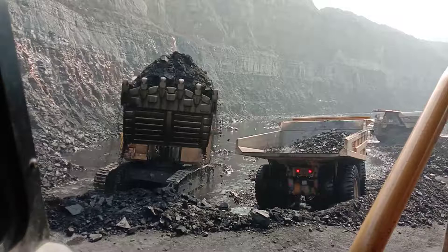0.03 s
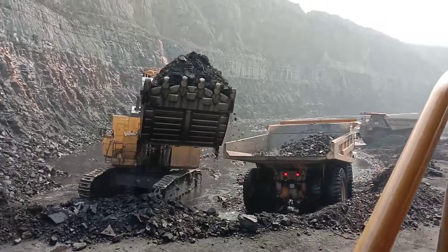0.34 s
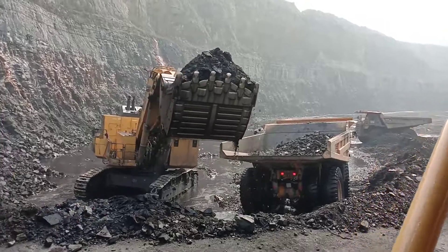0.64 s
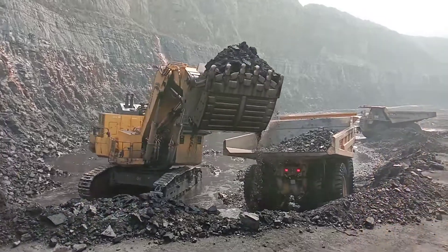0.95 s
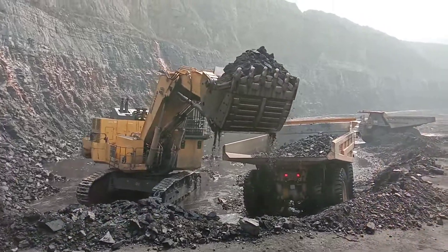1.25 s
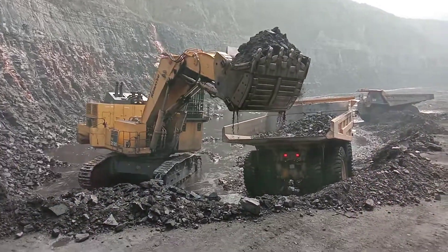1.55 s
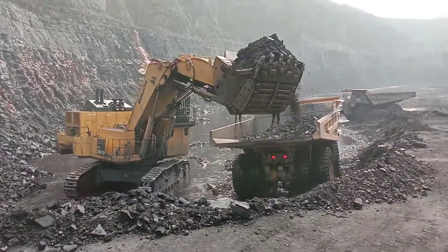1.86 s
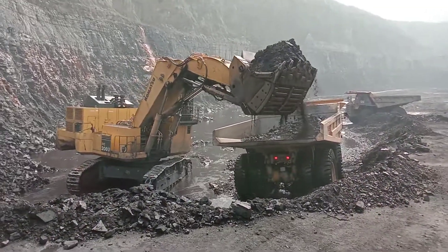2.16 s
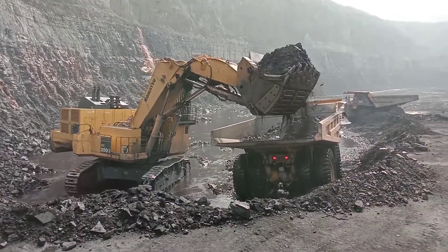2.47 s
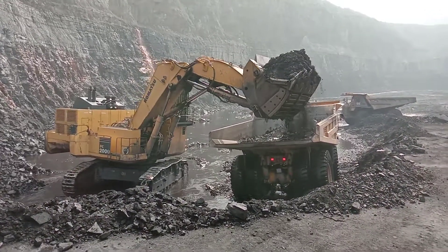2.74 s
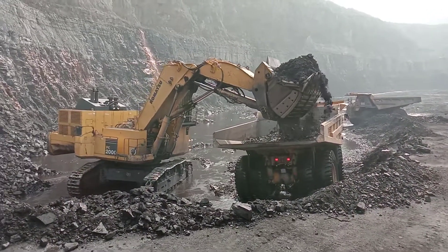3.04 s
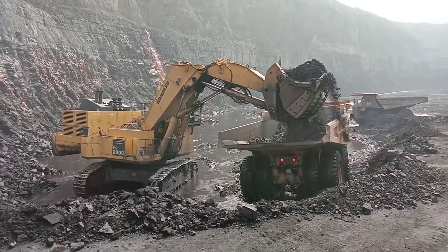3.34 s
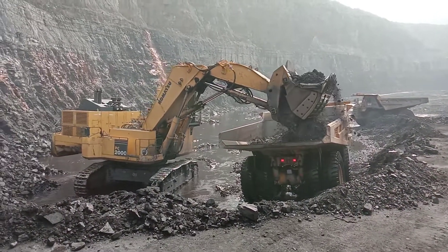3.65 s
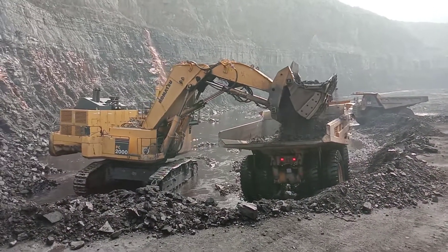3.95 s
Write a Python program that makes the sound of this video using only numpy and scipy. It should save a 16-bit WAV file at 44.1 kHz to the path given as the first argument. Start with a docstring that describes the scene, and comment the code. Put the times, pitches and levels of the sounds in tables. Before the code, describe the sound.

A big diesel engine idles close by in an open-pit mine, droning deeply and knocking. Farther off, an excavator squeaks and hums as it swings, then coal hisses into a truck with a few cracking lumps.

```python
"""A big diesel idles close by in an open-pit mine: a deep drone, knocks that repeat each engine cycle,
and a ringing cover. Farther off an excavator swings its bucket over a truck, its joints squeaking and
its hum rising under load. It tips out coal: fines hiss over the steel, small pieces rattle,
and a few heavier lumps crack down into the truck body."""
import sys
import numpy as np
from scipy import signal
from scipy.fft import rfft, irfft
from scipy.io import wavfile
from scipy.ndimage import uniform_filter1d

SR = 44100
rng = np.random.default_rng(int(sys.argv[2]) if len(sys.argv) > 2 else 0)


def digitize_waveform(pressure):
    """Quantize a signal to 16-bit integers and store it at the path in sys.argv[1].

    Rows of a 2-D input are taken as channels; values are limited to [-1, 1].
    """
    field = np.atleast_2d(pressure).T
    bounded = np.clip(field, -1, 1)
    quanta = np.round(bounded * 32767).astype(np.int16)
    wavfile.write(sys.argv[1], SR, quanta)


N = 176400
CYCLE_HZ = 5.8315  # four-stroke cycles per second


def undb(db):
    return 10 ** (np.asarray(db) / 20)


def unit_rms(x):
    return x / np.sqrt(np.mean(x ** 2))


def clock():
    return np.arange(N) / SR


def noise():
    return rng.standard_normal(N)


def curve(points):
    """Straight lines through (time_s, value) points."""
    return np.interp(clock(), *np.array(points).T)


def colour(x, points):
    """Filter by (freq_hz, gain_db) points."""
    hz, db = np.array(points, float).T
    bins_hz = np.maximum(np.arange(N + 1) * SR / (2 * N), 1)
    gain = undb(np.interp(np.log(bins_hz), np.log(hz), db))
    return irfft(rfft(x, 2 * N) * gain)[:N]


def ring(x, hz, width_hz):
    """One resonance."""
    return signal.lfilter(*signal.iirpeak(hz, hz / width_hz, fs=SR), x)


def wander(rate_hz):
    """Smooth random drift, rms 1."""
    hold = int(SR / rate_hz)
    steps = np.repeat(rng.standard_normal(N // hold + 1), hold)
    return unit_rms(uniform_filter1d(uniform_filter1d(steps, hold), hold)[:N])


def tone(hz):
    """Sine of rms 1 on a fixed or moving pitch."""
    turns = np.cumsum(hz * np.ones(N)) / SR + rng.random()
    return np.sqrt(2) * np.sin(2 * np.pi * turns)


def impact_power(starts_s, sizes, decay_s):
    """Power envelope of decaying blows."""
    hits = np.bincount((starts_s * SR).astype(int), sizes ** 2, N)[:N]
    return signal.lfilter([1], [1, -np.exp(-2 / (decay_s * SR))], hits)


def treble_flicker(x, depth_db=1.1):
    """Each treble band wavers in level on its own."""
    bins_hz = np.arange(N // 2 + 1) * SR / N
    edges_hz = np.geomspace(2000, 16000, 19)
    spectrum = rfft(x)
    out = irfft(spectrum * (bins_hz < edges_hz[0]), N)
    for low, high in zip(edges_hz, edges_hz[1:]):
        band = irfft(spectrum * ((bins_hz >= low) & (bins_hz < high)), N)
        out += band * undb(depth_db * wander(30.04))
    return out


# Diesel cover whine: time_s, level_db
GEAR_LEVELS = [(.3, -40), (1.7, -36.5), (2.22, -29), (2.55, -33), (4, -33)]

def diesel_cover_whine(pitch_hz=1273, drift=0.01207, waver_db=1.5):
    """A warbling whine from the diesel's ringing cover, loudest from about 2.2 s."""
    whine = tone(pitch_hz * (1 + drift * wander(40)))
    return whine * undb(curve(GEAR_LEVELS) + waver_db * wander(25.05))


# Excavator hum: time_s, pitch_hz, level_db
LOAD_HUM = [(.4, 158.4, -37), (1.2, 160.4, -33.5), (1.55, 172, -27), (1.85, 176.2, -33.5),
            (3.0, 178.8, -41), (3.22, 171.3, -29), (3.43, 172.5, -26), (3.75, 172, -30), (4, 172.6, -49)]

def excavator_hum(drift=0.0068, waver_db=1.1):
    """The hum rises and swells under load."""
    time_s, pitch_hz, level_db = np.array(LOAD_HUM).T
    hum = tone(np.interp(clock(), time_s, pitch_hz) * (1 + drift * wander(15)))
    return hum * undb(np.interp(clock(), time_s, level_db) + waver_db * wander(12))


# Boom and bucket squeaks: centre_s, half_length_s, pitch_hz, level_db
JOINT_SQUEAKS = [(0.457, 0.0095, 10100, -49), (.60, .02, 2740, -37), (.84, .035, 2620, -35),
                 (0.94, 0.023, 2780, -33), (1.04, 0.027, 2770, -35), (1.113, 0.023, 2800, -29.5),
                 (1.34, 0.02, 2630, -38), (1.378, 0.021, 2540, -33), (1.535, .035, 2580, -34),
                 (1.682, .02, 2620, -30), (1.725, .02, 2480, -36), (2.65, 0.057, 7380, -35.5),
                 (2.728, 0.014, 6980, -34), (3.095, .035, 2590, -29)]

def joint_squeaks(width_hz=84):
    """Joints give short rough squeaks as the boom swings and the bucket tips."""
    out = np.zeros(N)
    for centre_s, half_length_s, pitch_hz, level_db in JOINT_SQUEAKS:
        squeak = ring(ring(noise(), pitch_hz, width_hz), pitch_hz, 2 * width_hz)
        envelope = np.exp(-((clock() - centre_s) / half_length_s) ** 2)
        out += undb(level_db) * unit_rms(squeak) * envelope
    return out


# Coal flow off the bucket: time_s, level_db
COAL_FLOW = [(.5, -42.5), (1.22, -34.5), (1.35, -34), (1.93, -32), (2.05, -27), (2.2, -25), (2.48, -27.5),
             (2.72, -27.5), (3.05, -28.5), (3.5, -29.5), (4, -28)]
# Sliding coal spectrum: freq_hz, density_db
COAL_SPECTRUM = [(300, -36), (1000, -1), (2000, 5), (3800, 2), (5500, -1.5), (7000, -5), (10000, -10.5),
                 (13000, -20), (15500, -24)]
# Resonances of the steel under the coal: freq_hz, width_hz, gain_db
STEEL_MODES = [(1545, 17, -2), (2135, 14, -3), (3660, 14, -5), (6000, 13, -17), (6475, 45, 1),
               (6900, 470, -6), (7350, 180, -9.5)]

def sliding_coal(grains_per_s=320, grain_share=0.23, spread_db=0.5, flicker_db=3):
    """Fines hiss and small pieces tick as the load slides out, making the steel sing."""
    hiss = noise()
    when, chance = rng.random((int(grains_per_s * N / SR), 2)).T
    sizes = undb(-spread_db * np.log(chance))
    power = impact_power(when * N / SR, sizes, decay_s=0.0041)
    envelope = np.sqrt(1 - grain_share + grain_share * power / power.mean())
    stream = colour(hiss * envelope, COAL_SPECTRUM)
    steel = sum(undb(gain_db + flicker_db * wander(9.15)) * ring(stream, freq_hz, width_hz)
                for freq_hz, width_hz, gain_db in STEEL_MODES)
    return unit_rms(stream + steel) * undb(curve(COAL_FLOW))


# Lumps landing in the truck: start_s, gain_db, centre_hz
LUMP_HITS = [(1.881, -20, 980), (2.026, -25, 3200), (2.237, -25.5, 3070), (2.724, -27, 2800),
             (2.748, -22, 2170), (2.824, -24, 4000), (2.902, -31, 6460), (3.022, -38, 3130),
             (3.342, -24, 3280), (3.58, -24, 900), (3.80, -26, 795)]

def coal_lumps(rise_s=0.0021, decay_s=0.019):
    """Lumps crack on the heap, some dull and some bright."""
    out = np.zeros(N)
    for start_s, gain_db, centre_hz in LUMP_HITS:
        age_s = np.maximum(clock() - start_s, 0)
        band = ring(noise(), centre_hz, width_hz=centre_hz)
        crack = unit_rms(ring(band, centre_hz, width_hz=centre_hz))
        envelope = 1.17 * (1 - np.exp(-age_s / rise_s)) * np.exp(-age_s / decay_s)
        out += undb(gain_db) * crack * envelope
    return out


# Engine cycle harmonics: order, level_db
ENGINE_ORDERS = [(8, -58), (12, -37.5), (14, -41), (16, -46), (17, -39), (18, -38), (19, -35.5),
                 (21, -23.5), (22, -38.5), (25, -35.5), (30, -68), (32, -36), (38, -42.5), (42, -50)]
# Gear and pump whines: pitch_hz, level_db
ENGINE_WHINES = [(248.5, -40.5), (309.5, -41), (394, -38), (541.7, -42), (893.6, -41.5), (1073, -40)]
# Exhaust rumble spectrum: freq_hz, density_db
EXHAUST_SPECTRUM = [(20, -12), (35, -25), (55, -6.5), (75, -16.5), (95, 9), (130, -5.5), (180, -2),
                    (260, -13.5), (500, -14), (1500, -50)]

def diesel_drone(order_waver_db=0.8, whine_waver_db=1, whine_drift=0.00087, rumble_db=-28.5):
    """Low orders of the engine cycle over exhaust rumble, with thin gear and pump whines."""
    orders = sum(undb(level_db + order_waver_db * wander(14)) * tone(order * CYCLE_HZ)
                 for order, level_db in ENGINE_ORDERS)
    whines = np.zeros(N)
    for pitch_hz, level_db in ENGINE_WHINES:
        gain = undb(level_db + whine_waver_db * wander(10))
        whines += gain * tone(pitch_hz * (1 + whine_drift * wander(12)))
    rumble = undb(rumble_db) * unit_rms(colour(noise(), EXHAUST_SPECTRUM))
    return orders + whines + rumble


# Knocks in one engine cycle: cycle_fraction, strength_db
CYCLE_KNOCKS = [(0.051, 0.5), (.115, -1), (0.182, -4), (0.408, -4), (0.489, -1.5), (.565, -8.5), (0.632, 1),
                (0.769, -10.5), (0.828, -3.5), (.905, 3)]
# Block and valve clatter spectrum: freq_hz, density_db
BLOCK_SPECTRUM = [(120, -34), (200, 5.5), (300, 0.5), (500, -2), (720, 1), (900, -2.5), (1500, 0),
                  (2000, -5.5), (2700, -6.5), (3100, -12.5), (4000, -12), (6500, -22), (10000, -29),
                  (15500, -51)]

def diesel_clatter(block_db=-24, cover_db=-36, cover_hz=1262, scatter_db=0.8, waver_db=0.6):
    """The same uneven knocks come round each cycle, shake the block and ring a cover."""
    cycle_fraction, strength_db = np.array(CYCLE_KNOCKS).T
    cycles = np.arange(int(N / SR * CYCLE_HZ) + 1)[:, None]
    starts_s = (cycles + cycle_fraction) / CYCLE_HZ
    sizes = undb(strength_db + scatter_db * rng.standard_normal(starts_s.shape))
    power = impact_power(starts_s.ravel(), sizes.ravel(), decay_s=0.015)
    repeat_share, rattle_floor = 0.33, 0.9
    repeating = np.resize(noise()[:int(SR / CYCLE_HZ)], N)
    rattle = np.sqrt(repeat_share) * repeating + np.sqrt(1 - repeat_share) * noise()
    knocking = rattle * np.sqrt(power + rattle_floor ** 2)
    block = colour(knocking * undb(waver_db * wander(22.2)), BLOCK_SPECTRUM)
    cover = ring(ring(knocking, cover_hz, width_hz=95), cover_hz, width_hz=560)
    return undb(block_db) * unit_rms(block) + undb(cover_db) * unit_rms(cover)


def scene():
    """Diesel, excavator and coal, alike in both channels."""
    machines = diesel_drone() + diesel_cover_whine() + excavator_hum() + joint_squeaks()
    lumps = coal_lumps()
    swell = undb(curve([(0.15, -3.5), (0.65, 0)]))  # clatter comes up just after the drone
    clatter_and_coal = treble_flicker(swell * diesel_clatter() + sliding_coal())
    return np.tile(machines + lumps + clatter_and_coal, (2, 1))


# Microphone response: freq_hz, gain_db
MIC_RESPONSE = [(3500, 0.5), (4150, -1), (4400, -4), (6200, -1), (6600, 0), (7350, 0.5), (8000, -5.5),
                (8800, 0), (10500, 3.5), (12000, 1), (13900, 1.5), (14900, 8)]

def record(dry):
    """Microphone colour, a quick fade up from near silence, and a steep low-pass."""
    start_s, fade_s, floor_db, cutoff_hz = 0.15, 0.27, -72, 15450
    fade = np.clip((clock() - start_s) / fade_s, 0, 1) ** 0.85 + undb(floor_db)
    coloured = np.array([colour(channel, MIC_RESPONSE) for channel in dry])
    lowpass = signal.ellip(10, 0.2, 80, cutoff_hz, fs=SR, output="sos")
    return signal.sosfilt(lowpass, coloured * fade)


dry = scene()
out = record(dry)
digitize_waveform(out)
```